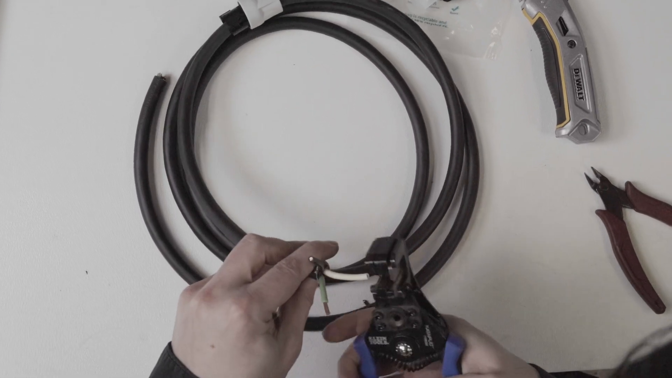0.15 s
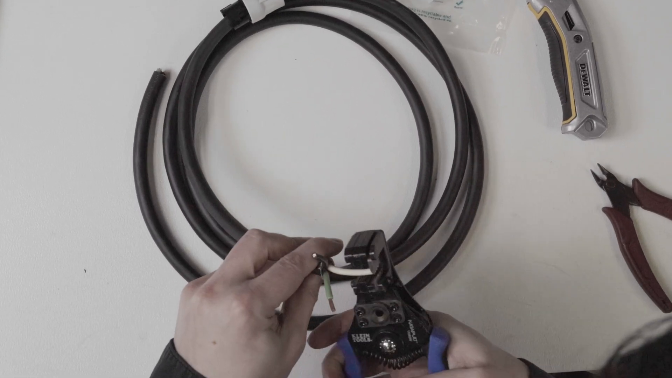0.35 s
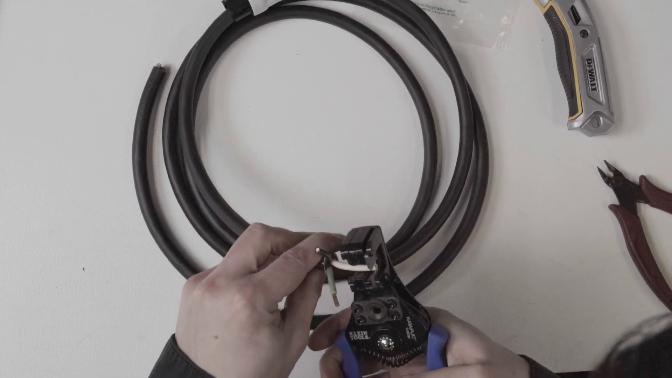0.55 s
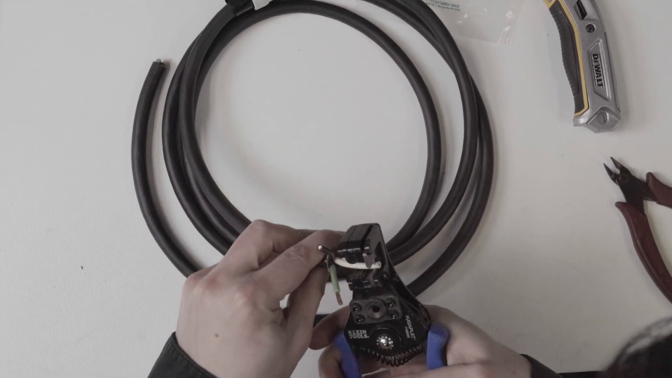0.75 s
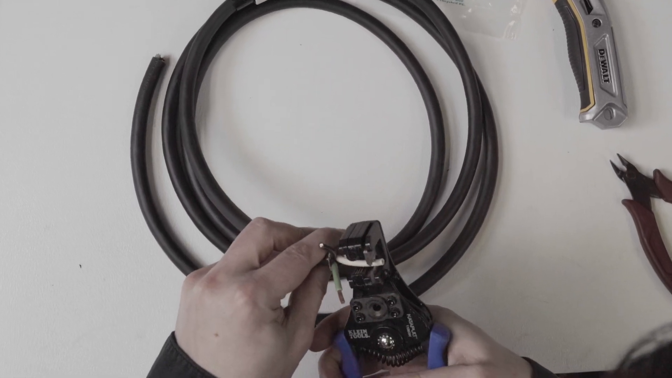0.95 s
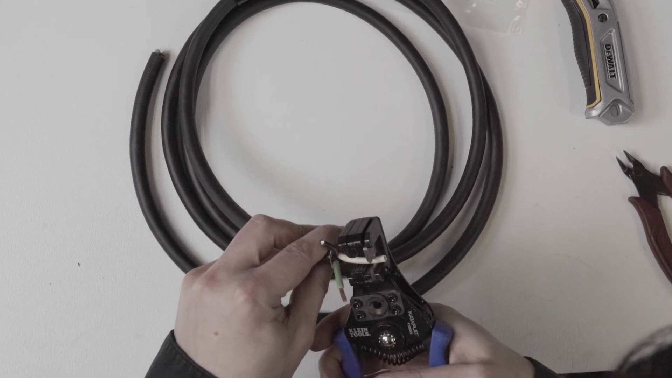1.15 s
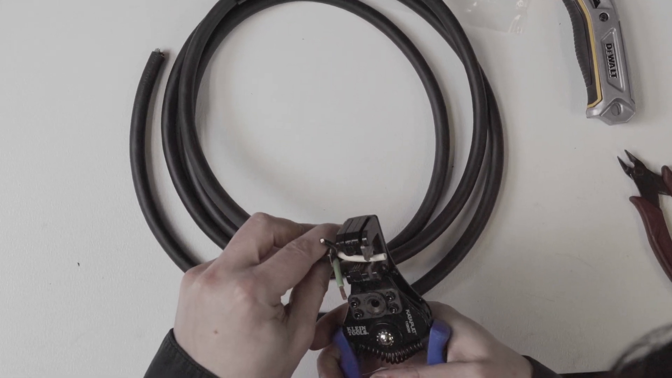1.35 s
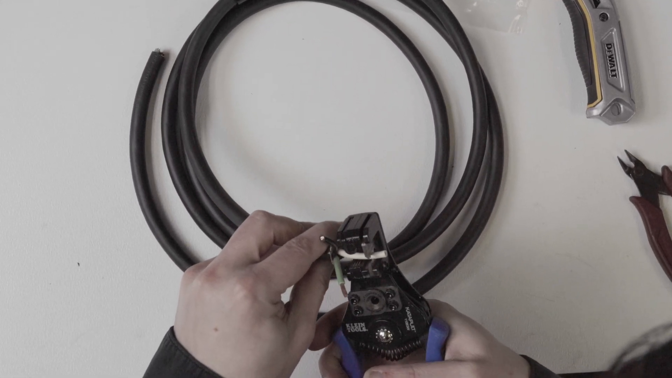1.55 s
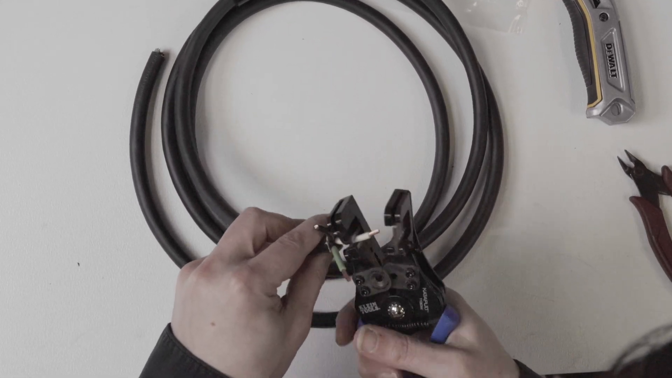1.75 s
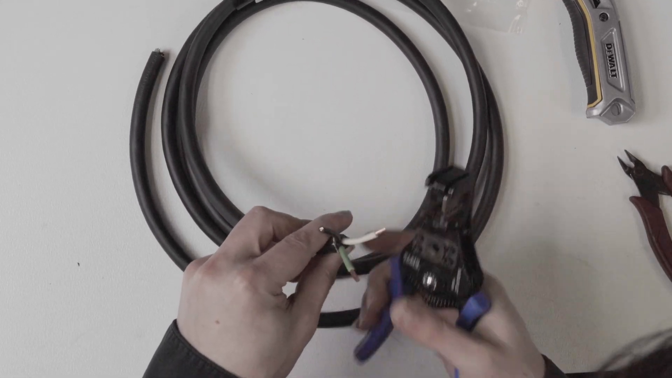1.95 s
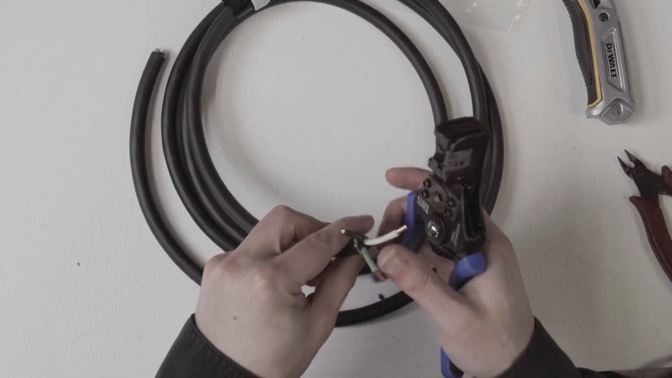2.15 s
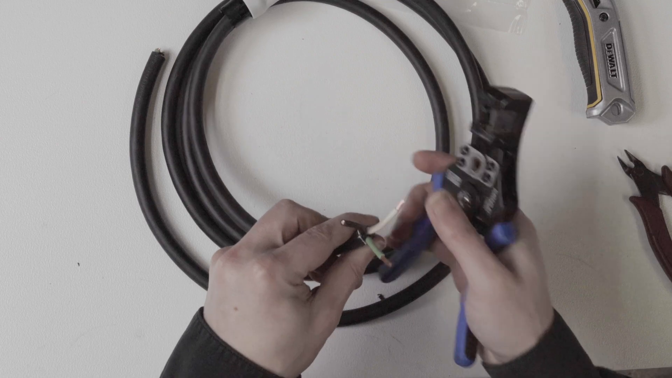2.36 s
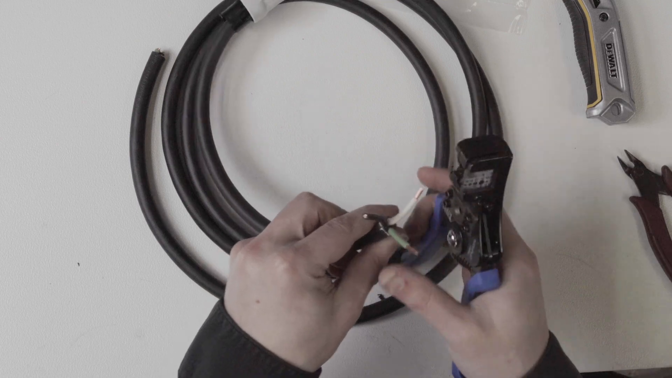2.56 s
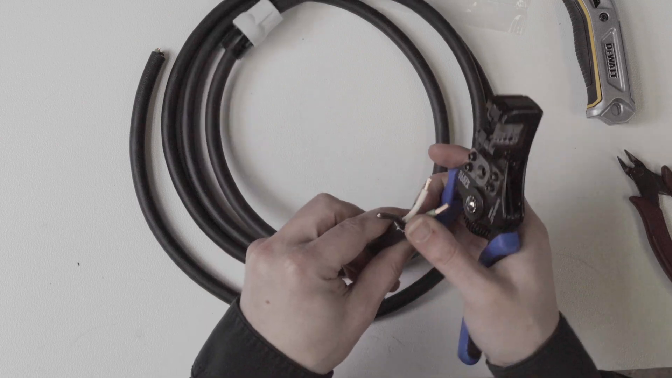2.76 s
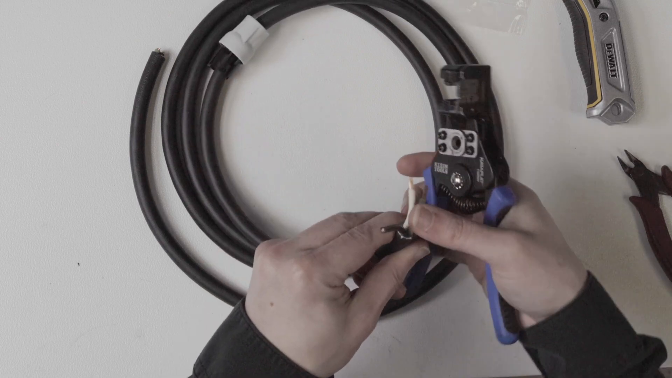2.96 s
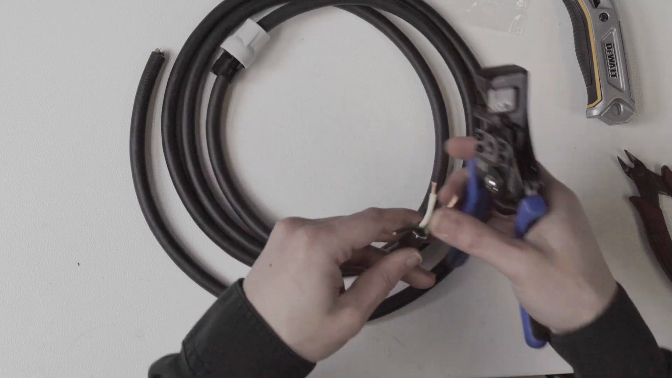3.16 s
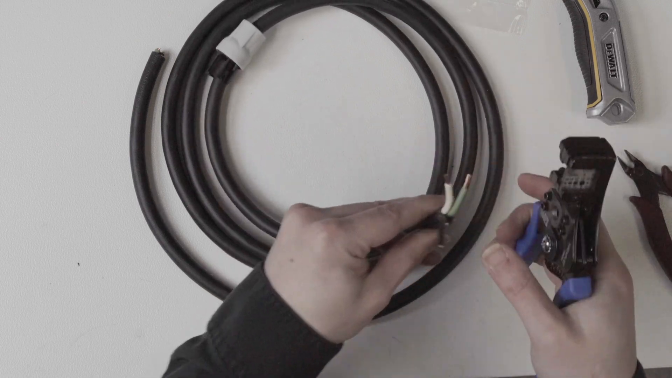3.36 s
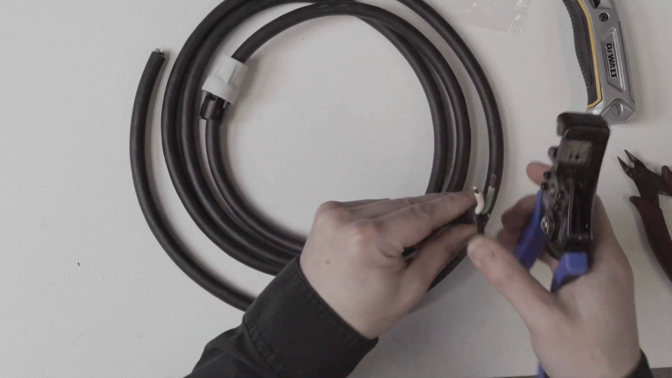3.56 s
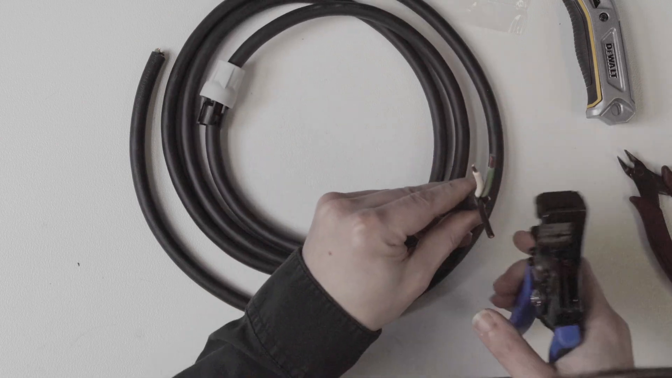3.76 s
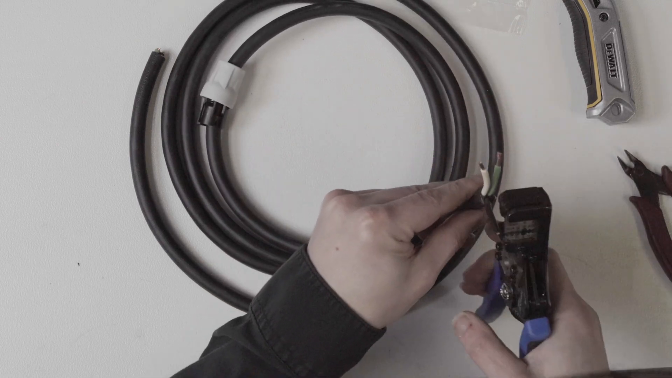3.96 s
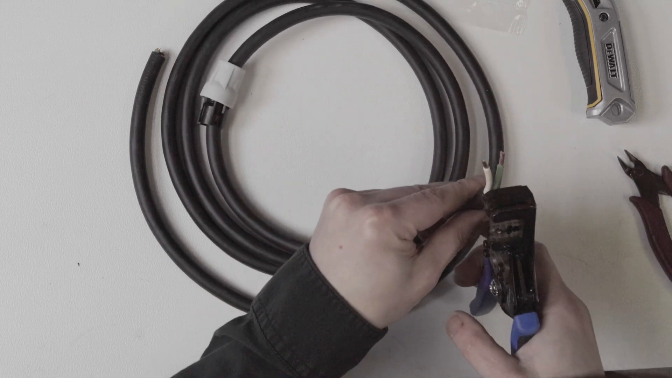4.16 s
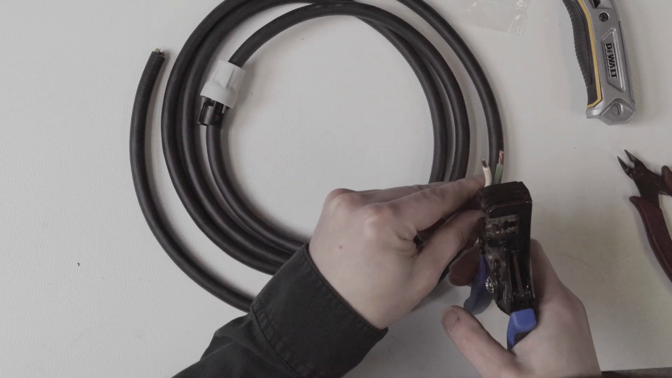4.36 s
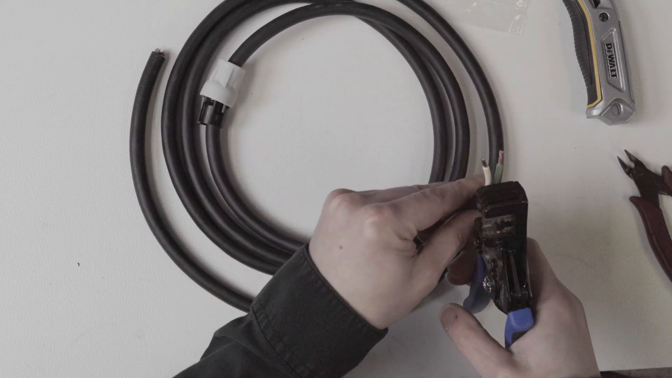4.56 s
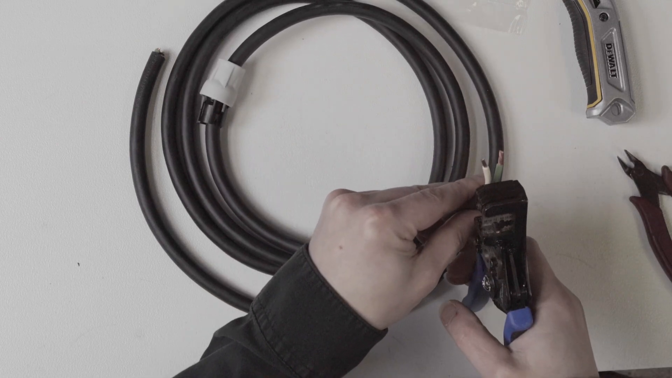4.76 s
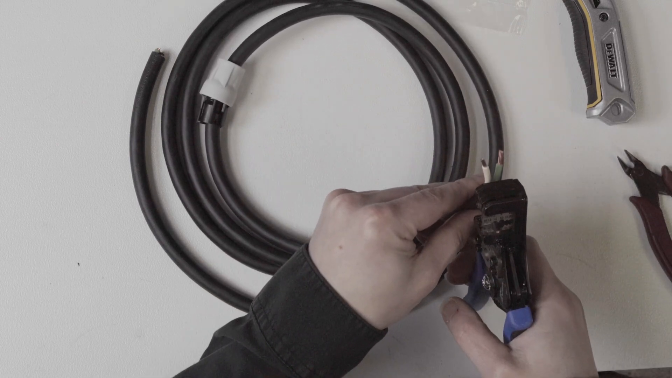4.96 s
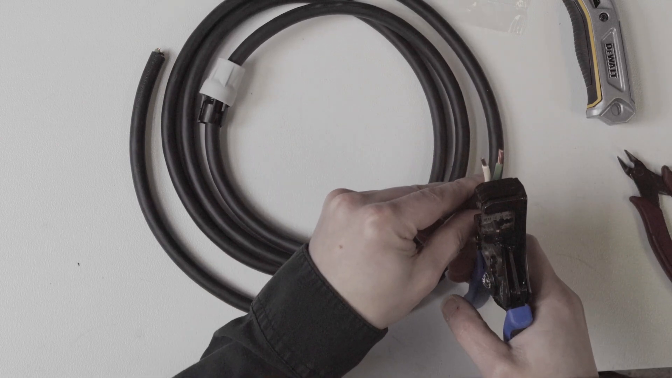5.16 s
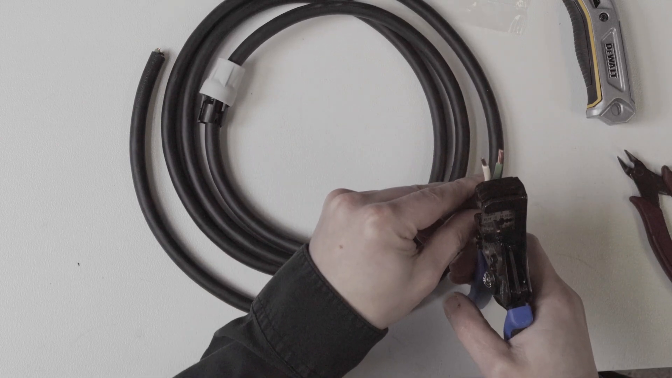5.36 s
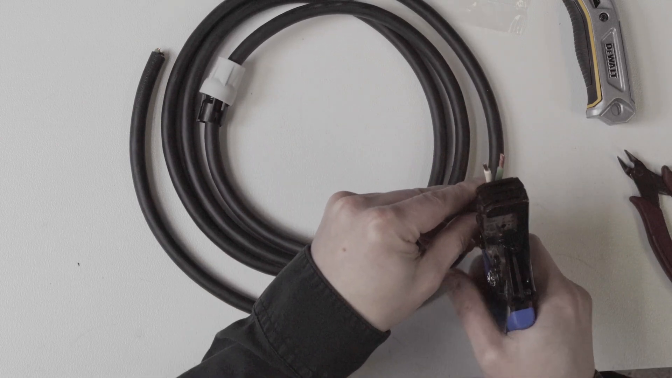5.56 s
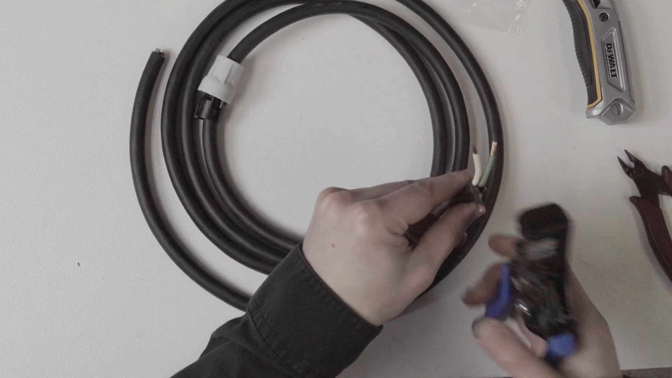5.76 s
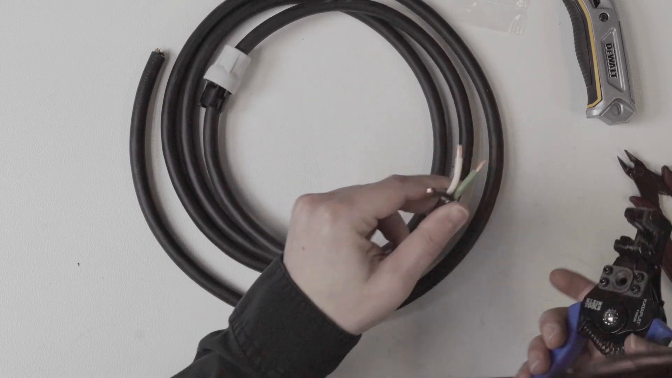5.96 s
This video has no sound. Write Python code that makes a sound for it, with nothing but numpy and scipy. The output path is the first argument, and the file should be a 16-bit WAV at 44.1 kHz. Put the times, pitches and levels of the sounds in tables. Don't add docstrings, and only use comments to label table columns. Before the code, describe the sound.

Close single microphone above a table in a small quiet room with faint wavering low hum. Tiny pivot ticks, then a wire stripper's latch clacks and its spring-loaded steel jaws slam hard. Small rattles settle; the rubber cable knocks and drags softly on the table. After a near-silent pause, a second clack and bright slam follow, then small clicks as the tool settles.

```python
import sys
import numpy as np
from scipy import signal
from scipy.io import wavfile
from scipy.ndimage import uniform_filter1d

SR = 44100
rng = np.random.default_rng(int(sys.argv[2]) if len(sys.argv) > 2 else 0)


def attenuation_scalar(level_db):
    decades = np.asarray(level_db, float) / 20
    return 10 ** decades


def file_out(sig):
    cols = np.atleast_2d(sig).T
    lim = np.clip(cols, -1, 1)
    pcm = np.round(lim * 32767).astype(np.int16)
    wavfile.write(sys.argv[1], SR, pcm)


N = 264600

# start_s, peak_db, frame_db, blades_db
SLAM = [
    (1.9183, -1.5, -8.5, -1),
    (5.7895, -4, -13, -0.5),
]
# delay_ms, level_db, contact_ms
REBOUNDS = [
    (0, -0.5, .8),
    (1.15, -10, 2.5),
    (4.7, -18.5, 3.3),
]
# start_s, peak_db, frame_db, blades_db, contact_ms
LATCH = [
    (1.7856, -17, 7.5, -1.5, 0.5),
    (1.7866, -10, -2.5, 1, 1.1),
    (5.6594, -36, -33, 21.5, 1.1),
    (5.6603, -9.5, -10.5, -4, 0.84),
]
# start_s, peak_db, frame_db, blades_db, contact_ms
BOUNCES = [(1.7788, -39.5, 4, -20, 0.33), (1.7836, -35.5, 4.5, -6, .8), (1.7932, -26, -15.5, -1, 1.3),
           (1.7975, -37, -2.5, -5, 0.97), (1.88, -33.5, -9, 2, 1), (1.8888, -26, -14, 1, .7),
           (1.8904, -21.5, -5.5, 2, 1.7), (1.907, -36, -8, 2, 1.1), (5.6515, -53, -8, -9, 0.84),
           (5.6630, -28.5, -5, 4, 1.9), (5.6668, -30, -20, -1, 0.84), (5.742, -47, -5, 7, .8),
           (5.7542, -40, -10, 5, 1.1), (5.7637, -26.5, -5.5, 3.5, 1.76), (5.7783, -25.5, -14, 2, 0.73),
           (5.7806, -41, -13, 1.5, 1.1)]
# start_s, peak_db, frame_db, blades_db
RATTLE = [(1.7115, -39.5, 0.5, -9), (1.7208, -43.5, -3, -4.5), (1.7491, -62, 5, -1.5),
          (2.0526, -46, -14, -14), (2.0834, -69, -15.5, 2.5), (2.0922, -59, -0.5, -8),
          (5.5376, -69, -7.5, 8), (5.5535, -60, -7, 7.5), (5.5632, -56.5, -4, -11),
          (5.58, -69.5, 12.5, -17), (5.6007, -48, 0, -6), (5.627, -58, 2, -7.5), (5.9039, -63, -4, -5),
          (5.9159, -48.5, -10.5, -1), (5.9392, -41.5, 2, 1), (5.9444, -48.5, -9, -2)]
# start_s, peak_db, frame_db, blades_db
TICKS = [(0.0053, -60, 3.5, 2.5), (0.0302, -64, 3, -20), (0.0729, -64, 7, 6), (0.0773, -47.5, -6.5, -1),
         (0.1074, -58.5, -1.5, -14), (0.5642, -66.5, -4, 9), (0.81, -62, -17, 0.5), (2.2051, -58, 2, -17),
         (2.2109, -62, 10, -16), (2.2603, -54.5, -13, -12), (2.2698, -47, -21, 1),
         (2.2837, -68.5, -15, -9.5), (2.3156, -64.5, 3.5, 9), (2.3254, -52, -2.5, -10.5),
         (2.3287, -54, -13, -5), (2.3995, -54, 1.5, -7), (2.6285, -69, 0, 4), (2.9483, -56, -9, -16),
         (2.9809, -59.5, -2.5, -1), (3.0682, -68, 8, -2), (3.1713, -65, -2, -4), (3.1977, -58, -2, -17),
         (3.2792, -64, 2, -14), (3.5566, -57.5, -2, -9), (3.6834, -52.5, -7, -13.5), (3.7018, -70, 9, -18),
         (4.1212, -64, 3.5, -8), (4.4744, -56, -13, -19), (5.4215, -71, -5.5, 11), (5.4381, -66.5, 10, -15)]
# start_s, peak_db, frame_db, blades_db, contact_ms
KNOCKS = [(.4969, -76, 8, -20, 1.3), (.5381, -76, -7, -25, 0.75), (2.8552, -59.5, 4, -13, 1.6),
          (2.860, -50, -14.5, -7.5, 2.2), (2.8635, -48.5, -10.5, -8, 1.7), (3.1227, -73.5, 7.5, -16.5, 1.3),
          (3.135, -79.5, -12, -30, 4), (3.1456, -70, 9, -23, .9), (3.5776, -65.5, 16, -15, 1),
          (3.6385, -72, 3.5, -10, 1.1), (3.6687, -76, 6, -6, 0.87), (3.681, -62, -5.5, -15.5, 2.0)]
# peak_s, rise_s, fall_s, level_db
SCRAPE_SWELLS = [(.066, 0.0027, 0.035, -71.5), (1.714, 0.018, 0.043, -65), (1.785, 0.011, 0.00069, -59),
                 (1.896, 0.034, .025, -40.5), (1.9175, 0.022, 0.00084, -42.5), (2.23, 0.053, 0.0038, -80),
                 (2.272, 0.027, .037, -64.5), (2.33, .03, 0.023, -67.5), (2.398, .003, .035, -67.5),
                 (5.652, .001, .03, -52), (5.766, 0.031, 0.02, -43), (5.788, .045, .001, -57)]

# centre_hz, width_hz, level_db
JAWS = [(3970, 980, -1.5), (6130, 1100, 1), (6950, 430, 2.5), (7540, 320, 1.5), (8705, 500, 1.5)]
GRIPS = [(258.7, 340, -13), (523, 280, -5), (786, 220, -7), (1320, 380, -2)]
FRAME = [(1700, 300, -10), (2150, 310, -1), (2585, 390, 2.5), (3404, 600, -2), (4038, 310, -2)]
BLADES = [(9160, 230, 1.5), (10680, 900, 0.5), (12950, 920, -2), (14670, 1200, -1), (15600, 670, -3)]
# low_hz, high_hz
PART_RANGES = [(4000, 9000), (120, 1500), (1500, 4000), (9000, 17000)]
# mode_hz, level_db, t60_s
STEEL_MODES = [(2600, -5, .1), (2660, -3, .14), (3235, -3, .13), (3900, -4, .14), (3960, -4, .14),
               (5850, -4, .08), (7700, -3, .07), (10700, -4, .05), (12650, -3, .07)]
# mode_hz, level_db, t60_s
LEVER_MODES = [(850, -14, 0.044), (1213.8, -6.5, 0.066), (2080, 0, 0.063), (2420, -6.5, 0.045),
               (3100, -7, .06), (4377, -3, .05)]

# mode_hz, level_db, t60_s
PAWL_MODES = [(1177, -15, 0.029), (2400, 1.5, 0.018), (2143, -6.5, 0.013), (4240, -2, .014),
              (6905, -1, 0.0061), (7700, -7.5, 0.0096), (9450, -5, .007)]
# start_s, level_db
CLACKS = [(.067, -69), (0.077, -58), (.565, -72), (1.7113, -46), (1.746, -61), (2.261, -65), (2.285, -62.5),
          (3.278, -68), (5.531, -70), (5.6005, -54), (5.6605, -17.5), (5.7644, -38), (5.904, -57),
          (5.916, -50), (5.939, -40)]

# peak_s, rise_s, fall_s, level_db, brightness_db
DRAG_SWELLS = [
    (.49, 0.038, 0.18, -76, -24),
    (2.86, 0.0071, 0.014, -50, 0.5),
    (2.875, 0.011, 0.14, -58, -19.5),
    (3.138, .012, 0.11, -63.5, -16.5),
    (3.272, 0.044, 0.055, -69.5, -9),
    (3.435, 0.054, 0.22, -78, -13),
    (3.482, 0.02, 0.24, -62, -3.5),
    (3.575, .2, 0.057, -63, -4.5),
    (3.684, 0.0065, 0.045, -60, -5.5),
    (5.064, .1, 0.032, -74, -19),
]
# peak_s, rise_s, fall_s, level_db
SHUDDER_SWELLS = [
    (1.778, 0.0016, 0.12, -53),
    (1.90, .05, .003, -57.5),
    (5.654, .002, 0.21, -56),
]
# centre_hz, width_hz, level_db
SHEATH = [(295, 420, -2), (755, 500, 2), (1340, 790, -4.5)]
GRIT = [(1926, 1220, 0.5), (2790, 400, 8), (4030, 560, -5), (5130, 410, 2), (6600, 650, -6)]
COIL = [(91, 27, 3.5), (198.3, 130, 0), (331.4, 250, -6), (510, 450, -3.5)]

THUMP_S = [1.7868, 1.790, 1.918, 5.662, 5.7886, 2.862, 2.95, .538, .4965, 3.134, 1.919, 5.7886, .538]
# peak_db, pitch_hz, t60_s, direction
THUMPS = [(-31.5, 61, 0.0061, -1), (-35, 59, 0.067, 1), (-33, 130, .006, 1), (-45, 57, 0.15, 1),
          (-23.5, 12, 0.038, 1), (-48, 290, 0.089, 1), (-56.5, 278, 0.11, 1), (-47.5, 58, 0.032, 1),
          (-53, 1690, 0.014, 1), (-54.5, 279, 0.11, 1), (-43.5, 65, 0.07, 1), (-33.5, 6.5, 0.22, -1),
          (-61, 890, 0.023, 1)]

# time_s, level_db
HUM_LEVELS = [(0, -60.5), (.3, -66.5), (.67, -61), (1.2, -73), (1.35, -78.5), (1.5, -67), (1.7, -73),
              (2.0, -70), (2.7, -72), (3.0, -75), (3.5, -69), (4.35, -64), (4.6, -66), (4.85, -73),
              (5.1, -79.5), (5.45, -64), (5.75, -62), (6, -61.5)]
HUM_HZ = 212
# pitch_hz, density_db_per_hz
AIR_SPECTRUM = [(10, 1.5), (25, 5), (45, -6.5), (110, -7.5), (170, -12.5), (270, -16), (450, -17),
                (650, -14.5), (900, -23.5), (1330, -22.5), (1600, -29.5), (3100, -35), (12200, -36),
                (16000, -58)]
AIR_DB = -69.5
# centre_hz, width_hz, level_db
VENT = [(1327, 40, -90.5), (4420, 780, -91), (6230, 150, -99.5)]
# low_hz, high_hz, level_db, t60_s
ROOM_TAIL = [(150, 910, -26, .22), (885, 1700, -25, 0.28), (1940, 3200, -27, 0.2), (3280, 6800, -32, 0.36),
             (4992, 8300, -25.5, .2), (7500, 10500, -26.5, 0.15), (10800, 20000, -23.5, 0.19),
             (13300, 17000, -24, .15)]


def stripper():
    slam_drive = slam()
    latch_drive = contacts(LATCH, rise=0.87, grit_db=2.0, grips_db=-9.5)
    small_drive = loose_parts() + scrape()
    knock_drive = contacts(KNOCKS, rise=0.11, grit_db=-4.0, grips_db=8)
    drive = slam_drive + latch_drive + small_drive + knock_drive
    click = 0
    for part_drive, peaks, edges_hz in zip(drive, (JAWS, GRIPS, FRAME, BLADES), PART_RANGES):
        click = click + band(body(part_drive, peaks), *edges_hz)
    steel = ring(slam_drive[2] + attenuation_scalar(-11) * small_drive[0], STEEL_MODES)
    lever = ring(latch_drive[2], LEVER_MODES)
    return click + attenuation_scalar(-35.0) * steel + attenuation_scalar(-41.0) * lever


def slam():
    blows = []
    for start_s, db, frame_db, blades_db in SLAM:
        for delay_ms, fall_db, contact_ms in REBOUNDS:
            blows.append((start_s + delay_ms / 1000, db + fall_db, frame_db, blades_db, contact_ms))
    return contacts(blows, rise=0.055, grit_db=2.5, grips_db=-14.5)


def loose_parts():
    bounces = contacts(BOUNCES, rise=0.43, grit_db=6.0, grips_db=-14)
    rattle = contacts(RATTLE, rise=0.43, grit_db=8.0, grips_db=-15.5, ms=2.1)
    ticks = contacts(TICKS, rise=0.5, grit_db=4.5, grips_db=-12, ms=1.1)
    return bounces + rattle + ticks


def scrape():
    grain_db = 3.0 * rng.exponential(size=N) + 3.0 * walk(370)
    grind = level(rng.standard_normal(N) * attenuation_scalar(grain_db), 0)
    part_db = np.array([[-1], [-22], [-3], [-1]])
    return swells(SCRAPE_SWELLS) * grind * attenuation_scalar(part_db)


def contacts(events, rise, grit_db, grips_db, ms=1.1):
    size = 1200
    t = np.arange(size) / SR
    drive = np.zeros((4, N + size))
    for start_s, db, frame_db, blades_db, *own_ms in events:
        chance = rng.random((2, size))
        flurry = np.sign(chance[0] - 0.5) * attenuation_scalar(-grit_db * np.log(1 - chance[1]))
        tau_s = max(own_ms[0] if own_ms else ms, 0.2) / 1000
        rise_s = rise * tau_s
        flurry *= np.clip(t / rise_s, 0, 1) ** 2 * np.exp(-np.maximum(t - rise_s, 0) / tau_s)
        flurry /= np.sqrt(np.sum(flurry ** 2) / (tau_s * SR * (0.5 + rise / 5)))
        part_db = np.array([[0], [grips_db + frame_db / 2], [frame_db], [blades_db]])
        i = int(start_s * SR) - 26
        drive[:, i:i + size] += attenuation_scalar(db + part_db) * flurry
    return drive[:, :N]


def pawl():
    taps = np.zeros(N)
    for start_s, db in CLACKS:
        taps[int(start_s * SR)] = attenuation_scalar(db)
    return band(ring(taps, PAWL_MODES), 930, 13000)


def cable():
    grain_db = 3.6 * rng.exponential(size=N) + 4.0 * walk(160)
    grains = rng.standard_normal(N) * attenuation_scalar(grain_db)
    dull = level(body(grains, SHEATH), 0)
    bright = level(band(body(grains, GRIT), 930, 8500), 0)
    coil = level(band(body(grains, COIL), 40, 900), 0)
    slide = swells(DRAG_SWELLS) * dull + swells(DRAG_SWELLS, bright=True) * bright
    return slide + swells(SHUDDER_SWELLS) * coil


def thumps():
    size = 13000
    t = np.arange(size) / SR
    out = np.zeros(N + size)
    for start_s, (db, hz, t60_s, direction) in zip(THUMP_S, THUMPS):
        decay = np.exp(-np.log(1000) * t / t60_s)
        swing = np.cos(2 * np.pi * hz * t) * decay * np.minimum(t / 0.0015, 1)
        i = int(start_s * SR)
        out[i:i + size] += np.sign(direction) * attenuation_scalar(db) * swing
    return out[:N]


def room(x, gap_s=0.0026, bloom_s=0.0011):
    out = 0
    for low_hz, high_hz, db, t60_s in ROOM_TAIL:
        energy = np.pad(band(x, low_hz, high_hz) ** 2, (int(gap_s * SR), 0))[:N]
        bloom_keep = np.exp(-1 / (bloom_s * SR))
        decay_keep = np.exp(-np.log(1e6) / (t60_s * SR))
        for keep in (bloom_keep, decay_keep):
            energy = signal.lfilter([1], [1, -keep], energy)
        energy = energy / (bloom_s * SR * SR / 1000)
        noise = level(band(rng.standard_normal(N), low_hz, high_hz), db)
        out = out + np.sqrt(energy) * noise
    return out


def room_tone():
    return hum() + air() + vent()


def hum():
    t = np.arange(N) / SR
    hz = HUM_HZ + 1.3 * walk(5)
    gain = np.sqrt(2) * attenuation_scalar(np.interp(t, *np.transpose(HUM_LEVELS)))
    return gain * np.sin(2 * np.pi * np.cumsum(hz) / SR)


def air():
    out = 0
    knot_hz, knot_db = np.transpose(AIR_SPECTRUM)
    for hz in 14.3 * 2 ** np.arange(0, 10.1, 1 / 3):
        db = np.interp(np.log(hz), np.log(knot_hz), knot_db) + 10 * np.log10(hz)
        gain = attenuation_scalar(db + 0.8 * walk(6))
        out = out + gain * level(band(rng.standard_normal(N), hz / 1.13, hz * 1.13), 0)
    out = band(out, 3.9, 15000) + attenuation_scalar(-30.5) * out
    return level(out, AIR_DB)


def vent():
    return sum(level(body(rng.standard_normal(N), [(hz, width_hz, 0)]), db) for hz, width_hz, db in VENT)


def level(x, db):
    return x * attenuation_scalar(db) / np.sqrt(np.mean(x ** 2))


def band(x, low_hz, high_hz):
    return signal.sosfilt(signal.butter(2, [low_hz, high_hz], "bandpass", fs=SR, output="sos"), x)


def body(x, peaks):
    out, power = 0, 0
    for k, (hz, width_hz, db) in enumerate(peaks):
        b, a = signal.iirpeak(hz, hz / width_hz, fs=SR)
        out = out + (-1) ** k * attenuation_scalar(db) * signal.lfilter(b, a, x)
        power += attenuation_scalar(db) ** 2 * np.pi * width_hz / SR
    return out / np.sqrt(power)


def ring(x, modes):
    out = 0
    for hz, db, t60_s in modes:
        r = np.exp(-np.log(1000) / (t60_s * SR))
        w = 2 * np.pi * hz / SR
        out = out + attenuation_scalar(db) * signal.lfilter([np.sin(w)], [1, -2 * r * np.cos(w), r * r], x)
    return out


def walk(rate_hz):
    k = int(SR / rate_hz)
    steps = np.repeat(rng.standard_normal(N // k + 1), k)
    return 0.58 * uniform_filter1d(uniform_filter1d(steps, k), k)[:N]


def swells(rows, bright=False):
    t, power = np.arange(N) / SR, 0
    for peak_s, rise_s, fall_s, db, *tone_db in rows:
        slope = np.where(t < peak_s, (peak_s - t) / max(rise_s, 1e-3), (t - peak_s) / max(fall_s, 1e-3))
        power = power + attenuation_scalar(db + bright * sum(tone_db) - 20 * np.minimum(slope, 10)) ** 2
    return np.sqrt(power)


def scene():
    near = stripper() + pawl() + cable()
    return (near + room(near) + thumps() + room_tone())[None]


def low_pass(x):
    return signal.sosfilt(signal.butter(12, 17070, fs=SR, output="sos"), x)


def record(dry):
    rounded = 1.3 * np.tanh(dry / 1.3)
    top_cut = signal.ellip(8, 0.3, 60, 16000, fs=SR, output="sos")
    mix = signal.sosfilt(top_cut, rounded)
    return low_pass(mix)


dry = scene()
out = record(dry)
file_out(out)
```